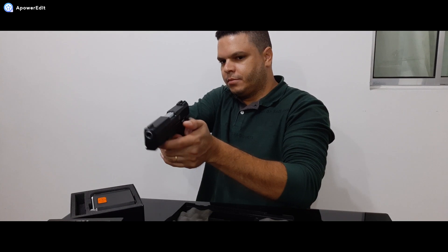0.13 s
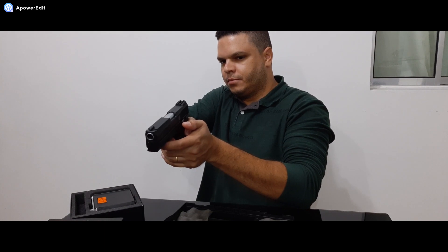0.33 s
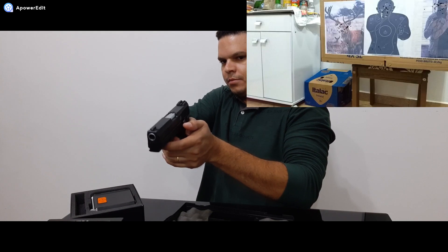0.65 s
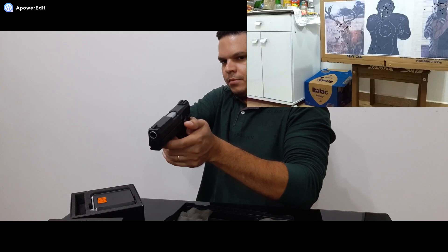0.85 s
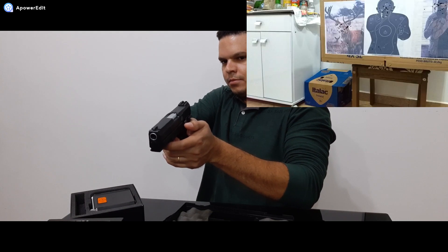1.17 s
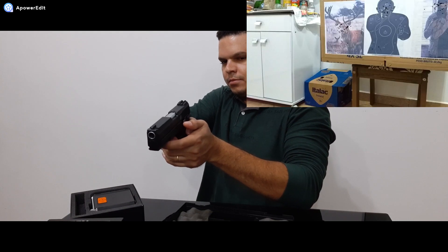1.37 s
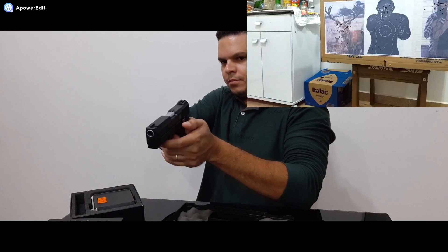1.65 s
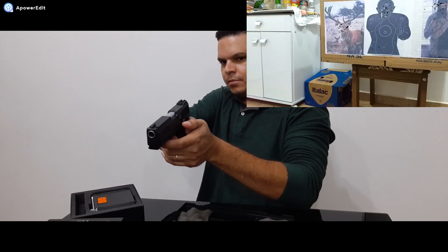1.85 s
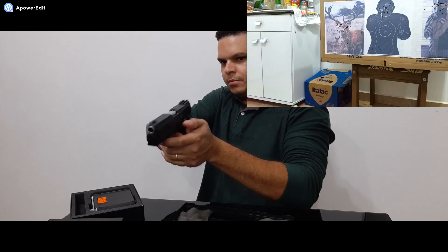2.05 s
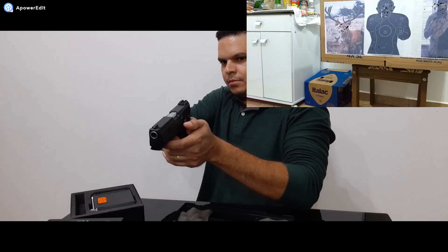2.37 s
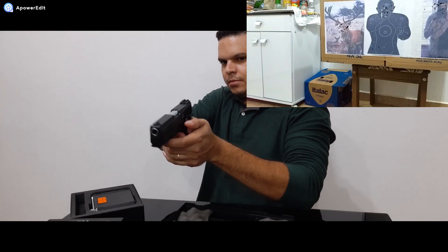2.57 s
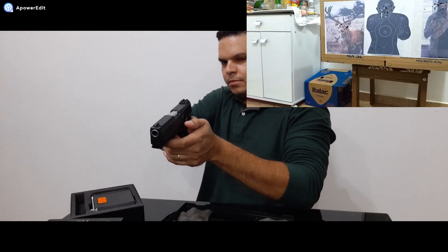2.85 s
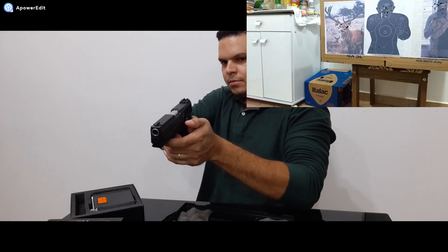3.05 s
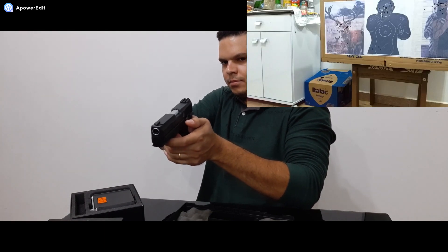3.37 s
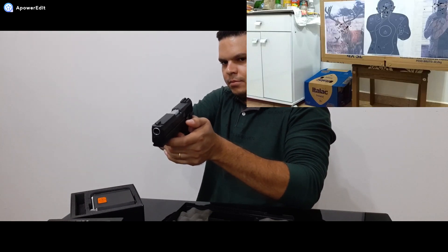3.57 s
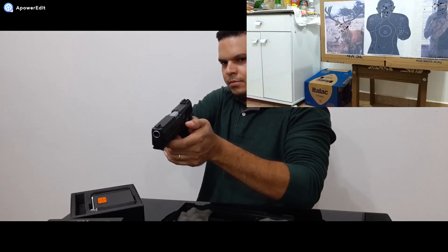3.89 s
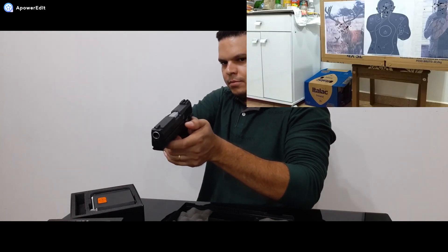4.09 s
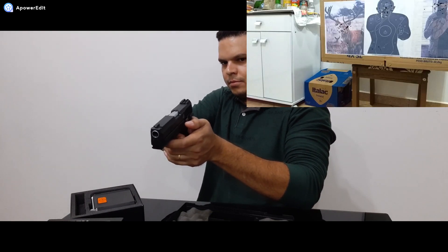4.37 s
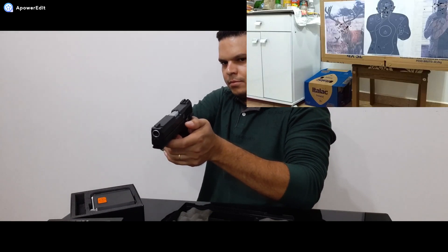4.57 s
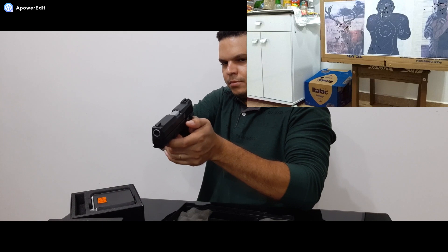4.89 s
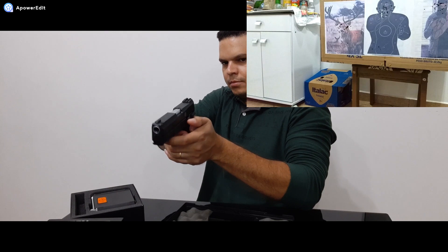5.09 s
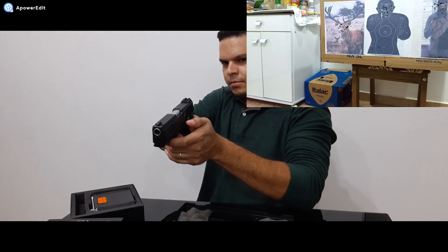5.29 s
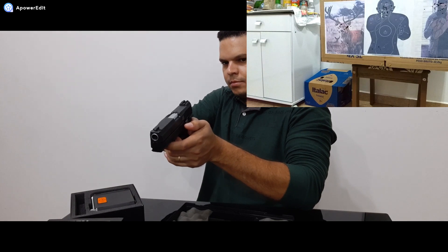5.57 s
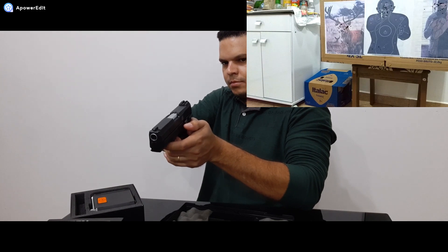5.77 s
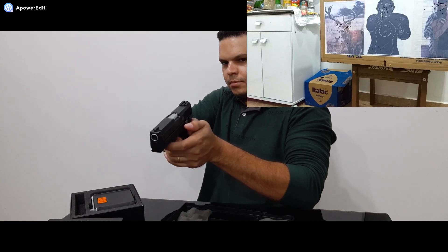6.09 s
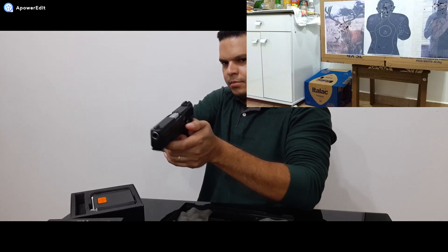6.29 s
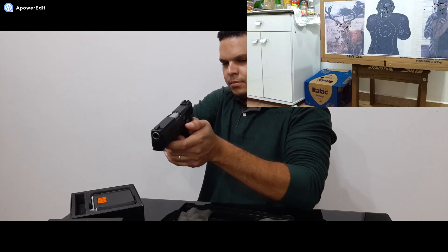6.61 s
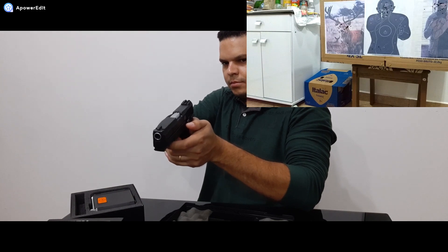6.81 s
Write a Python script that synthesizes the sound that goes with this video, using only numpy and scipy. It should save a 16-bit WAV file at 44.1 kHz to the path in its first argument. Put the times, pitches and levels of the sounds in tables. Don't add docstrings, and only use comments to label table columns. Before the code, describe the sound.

A small, hard-walled room with very quiet hush and faint hum opens on the decaying tail of an earlier shot. A small trigger tick at 0.1 s leads to the first gas pistol shot at 0.2 s. More follow at about 0.65, 1.15, 1.6, 2.1, 2.6, 3.25, 3.7, 4.5 and 5.15 s, then after a longer gap at 6.35 and 6.75 s. Each is a bright crack of a few milliseconds with a low push of air, gas hissing, and about 25 ms later the metal slide slamming into its stop. Reflections ring for nearly a second, overlapping the next shot. Dry clicks and bouncing pellets tick between shots until about 5.6 s. The close stereo microphone overloads; level dips around blasts, then swells briefly. The last ringing fades out abruptly around 7 s.

```python
import sys
import numpy as np
from scipy import signal
from scipy.fft import rfft, irfft
from scipy.io import wavfile
from scipy.ndimage import uniform_filter1d

SR = 44100
rng = np.random.default_rng(int(sys.argv[2]) if len(sys.argv) > 2 else 0)


def transcribe(signal):
    frames = np.atleast_2d(signal).T
    limited = np.clip(frames, -1, 1)
    pcm = np.round(limited * 32767).astype(np.int16)
    wavfile.write(sys.argv[1], SR, pcm)


def volts_from_db(level):
    exponent = np.asarray(level, float) / 20
    return 10 ** exponent


N = 306431

# (frequency [Hz], level [dB])
HUSH_SPECTRUM = [(25, -20.5), (70, -17), (237, -8), (354, -17), (543, -9), (729, -19), (3000, -30.5),
                 (14000, -35)]
# (frequency [Hz], level [dB])
HUM_LINES = [(120, -67.5), (242.2, -67), (543.7, -71.5), (1453, -73.5), (2186, -80.5), (4253, -88.5),
             (7628, -83.5), (7768, -83)]
# (time [s], room level [dB], brightness [dB/octave])
EARLIER_SHOT = (-0.27, -9.5, 0.09)
# (time [s], level [dB], brightness [dB/octave], room share [dB])
TICKS = [(0.0964, -24, -4, -5.5), (0.5624, -18.5, 0.6, -15.5), (.9208, -23.5, -4.5, -11),
         (.9792, -25.5, 0.5, -9.5), (.9941, -24, -3, -11.5), (1.416, -21.5, -6.5, -8),
         (1.447, -24, -1.5, -9.5), (1.5199, -30.5, -1.5, -11.5), (1.98, -21, -2.1, -10.5),
         (2.0054, -19.5, -2.5, -12.5), (2.528, -33, -0.2, -11.5), (2.5997, -20, -2, -8.5),
         (2.9327, -20, -.7, -15), (2.9984, -24, -2.44, -9), (3.1903, -29, -4, -3),
         (3.5544, -21.5, -1.6, -10), (3.6643, -30, -2.78, -9.5), (3.7058, -29.5, -0.1, -13.5),
         (4.7829, -21, -2.5, -10), (4.8995, -27.5, -0.5, -16.5), (5.1187, -23, -2.7, -6),
         (5.551, -25.5, -6, -8)]
# (time [s], push at left port [dB], push at right port [dB], early gas jet [dB], brightness [dB/octave])
SHOTS = [(.194, -13, -.5, -3, -0.04), (0.6447, -10, -30, -13.5, 1.16), (1.1377, -2.5, 1, -14, .49),
         (1.62, -18, -8, -10.5, 0.7), (2.1014, -4.5, -18, -2, -0.17), (2.6177, -15.5, -12, -11.5, 0.77),
         (3.2361, -2.5, -16, -6, .1), (3.7161, -4.5, -15.5, -13, 0.93), (4.5021, -6.5, -8, -11.5, 0.1),
         (5.1628, -5, -9.5, -3, 0.82), (6.351, 2.2, 1.5, -0.5, .21), (6.7416, 0.7, -17.5, -2.5, -0.2)]
# (time [s], length [s], loudest slide mode [Hz], level in the room [dB],
# room bloom near 700 Hz [dB])
SLIDE_STOPS = [(0.218, 0.018, 7500, -3.5, -2), (0.669, 0.013, 6400, -5.5, 3.5),
               (1.154, 0.019, 4360, -3.5, -1.2), (1.643, 0.016, 5940, -5, 3.5),
               (2.125, 0.028, 7660, -3, -2.3), (2.642, 0.014, 7000, -5, -1.5),
               (3.253, 0.024, 6700, -3.5, 0), (3.735, 0.016, 5990, -5, 6.5), (4.52, .023, 4330, -4, 1.2),
               (5.189, 0.01, 5750, -5, -0.4), (6.381, .0164, 6500, -4, -0.1),
               (6.764, 0.017, 6260, -3, -3.5)]
# (frequency [Hz], level [dB])
TICK_SPECTRUM = [(150, -58), (400, -11), (1000, -13), (3000, -2.5), (6000, -1), (11000, 3), (15500, -15.5)]
# (frequency [Hz], level [dB])
CRACK_SPECTRUM = [(120, -34.5), (200, 2.5), (1400, 1), (1710, -3), (2290, -1.5), (4250, -1), (5000, 0),
                  (7100, 1), (8180, -3.5), (9290, 3), (9900, -5), (11500, -2.5), (15500, -13)]
# (frequency [Hz], level [dB])
GAS_SPECTRUM = [(59, -44), (100, -14.5), (420, -22.5), (667, -9.5), (1260, -13.5), (1370, -5), (1920, -8),
                (2080, -5.5), (2980, -7), (5270, -6.5), (6650, -2.5), (11000, -7.5), (15500, -19)]
# (frequency [Hz], level [dB], T60 [s])
FRAME_MODES = [(1390, 0, 0.031), (1260, -0.5, 0.025), (520, -11, .012), (305, -3, 0.023)]
# (frequency [Hz], width [Hz], level [dB])
BODY_MODES = [(137.5, 16, 16), (309, 3.5, 11.5), (578, 12, 3), (495.7, 8.2, 5), (727, 12, 1.5),
              (1382, 13, 4), (2008, 310, 1), (4253, 190, 3), (5450, 40, -1), (6030, 97, 6), (7200, 140, 2),
              (7800, 75, 4), (8970, 84, 7.5)]
# (frequency [Hz], width [Hz], level [dB])
SLIDE_MODES = [(670, 120, 3), (1405, 60, 6.5), (2008, 91, 3), (4300, 400, 2.5), (5920, 160, 10),
               (6700, 450, 4), (8820, 170, 2), (10600, 830, 2)]
# (frequency [Hz], level [dB])
TAIL_SPECTRUM = [(24, -37.5), (40, -40), (114, -11), (294, 0), (368, -5.5), (496, -3), (636, -1.5),
                 (703, -4.5), (1600, -2.5), (2210, -2.5), (3060, -4), (7140, 0.5), (11000, -2.5),
                 (15500, -23.5)]
# (frequency [Hz], T60 [s])
ROOM_T60 = [(100, 0.96), (260, 0.81), (700, 1.0), (1840, 1.0), (4850, 0.85), (12800, 0.55)]
# (frequency [Hz], level [dB])
NEXT_ROOM = [(130, -17.5), (600, -15), (2000, -16.5), (6000, -23), (12000, -33.5)]
# (frequency [Hz], share alike [0..1])
LEFT_RIGHT_LIKENESS = [(60, .95), (400, .8), (1500, .1), (4000, .15), (8000, .7), (14000, .4)]
# (frequency [Hz], left minus right [dB])
PORT_LEAN = [(60, -0.5), (130, 0.5), (290, -0.5), (640, 0.5), (1410, -0.5), (3100, 0.5), (6820, -1.5),
             (12000, 0.5)]
# (time after the shot [s], gain [dB])
GAIN_CONTROL = [
    (.0, -1.6),
    (.035, -4),
    (0.05, -3.5),
    (.1, 1.5),
    (.16, 1.5),
    (.3, 0.04),
]

PORT_LAG = 6
HUSH_DB = -59
NEXT_ROOM_STRETCH = 1.9
RIPPLE_DB = 1.5
AIR_DB, AIR_PER_TILT = 1.5, 2
ROOM_ACCENT_DB = 2.5
TICK_T60_S, RATTLE_T60_S = .007, .075
CRACK_DB, CRACK_PER_JET = -3, 0.37
SLIDE_DB, SLIDE_PER_JET = -11, -1.01
KNOCK_DB, KNOCK_PER_PUSH = -12.5, .12
RING_SHARE, ACCENT_DB = .8, 4
HAMMER_S = .004
CRACK_RISE_S, CRACK_HOLD_S, CRACK_FALL_S = 0.00083, 0.0028, .0008
JET_START_S, JET_RISE_S, JET_HOLD_S, JET_FALL_S = 0.0055, .005, .019, 0.0043
JET_SAG, JET_REST = 0.15, 0.15
JET_CLUMP_DB, SLIDE_CLUMP_DB = 2.6, 3.5
REBOUND, REBOUND_S = .2, .004
SUCK_DB, SUCK_S, SUCK_WIDTH_S = -13, .0092, .0006
AHEAD_FROM_DB, AHEAD_FULL_DB = -14, -6.5
AHEAD_DB, AHEAD_S, AHEAD_MORE_S = -7.5, .008, .006
FADE_S = 0.013


def evened(x):
    return x / np.sqrt(np.mean(x ** 2) + 1e-20)


def read(points, hz):
    f, value = np.transpose(points)
    return np.interp(np.log(hz + 1), np.log(f + 1), value)


def tilted(hz, tilt_db):
    return tilt_db * np.log2((hz + 200) / 3000)


def resonance(hz, centre_hz, half_width_hz):
    return 1 / (1 + ((hz - centre_hz) / half_width_hz) ** 2)


def add(mix, s, sound):
    part = mix[:, round(s * SR):][:, :sound.shape[1]]
    part += sound[:, :part.shape[1]]


def colour(x, points, tilt_db=0., ring=0., modes=BODY_MODES):
    hz = np.fft.rfftfreq(x.shape[-1], 1 / SR)
    db = read(points, hz) + tilted(hz, tilt_db)
    db = db + ring * sum(mode_db * resonance(hz, f, width / 2) for f, width, mode_db in modes)
    return irfft(rfft(x) * volts_from_db(db), x.shape[-1])


def pair(count):
    hz = np.fft.rfftfreq(count, 1 / SR)
    shared_noise, left_only_noise = rfft(rng.standard_normal((2, count)))
    alike = np.clip(read(LEFT_RIGHT_LIKENESS, hz), 0, 1)
    lean = volts_from_db(read(PORT_LEAN, hz) / 2)
    lead = np.exp(2j * np.pi * np.minimum(hz * PORT_LAG / SR, 1))
    left = (alike * shared_noise + np.sqrt(1 - alike ** 2) * left_only_noise) * lead
    return irfft(np.array([left * lean, shared_noise / lean]), count)


def puff(points, tilt_db, envelope, ring=0.63, clump_db=0.):
    count = len(envelope)
    lumps = volts_from_db(clump_db * evened(uniform_filter1d(rng.standard_normal(count), 90)))
    noise = evened(colour(pair(8192), points, tilt_db, ring, BODY_MODES + SLIDE_MODES))
    return noise[:, :count] * envelope * lumps


def accent(x, hz, db):
    return colour(x, [(1, 0), (SR, 0)], ring=0.58, modes=[(hz, 700, db)])


def background():
    t = np.arange(N) / SR
    hush = volts_from_db(HUSH_DB) * evened(colour(pair(N + N % 2), HUSH_SPECTRUM))[:, :N]
    waver = evened(uniform_filter1d(rng.standard_normal((len(HUM_LINES), N)), 1200))
    hum = sum(volts_from_db(db) * w * np.sin(2 * np.pi * hz * t) for (hz, db), w in zip(HUM_LINES, waver))
    return hush + hum


def room(hits, points, wait_s, build_s):
    size = 2 * (N // 2 + 1)
    rough = uniform_filter1d(uniform_filter1d(rng.standard_normal(size // 2 + 1), 80), 80)
    noise = colour(pair(size), points, ring=0.87)
    noise = irfft(rfft(noise) * volts_from_db(RIPPLE_DB * evened(rough)), size)
    hz, t, z = signal.stft(evened(noise), SR, nperseg=256, noverlap=192)
    hz = hz[:, None]
    power = np.zeros(z.shape[1:])
    for s, db, tilt_db, bloom_db, air_db, mode_hz, mode_db in hits:
        near = (t > s) & (t < s + 1.5)
        age = t[near] - s
        start_db = db + tilted(hz, tilt_db)
        start_db = start_db + bloom_db * resonance(hz, 700, 350)
        start_db = start_db + air_db * resonance(hz, 12000, 2000)
        start_db = start_db + mode_db * resonance(hz, mode_hz, 400)
        fall_db = 60 * age / read(ROOM_T60, hz)
        this_room = volts_from_db(start_db - fall_db) ** 2
        next_room = volts_from_db(start_db + read(NEXT_ROOM, hz) - fall_db / NEXT_ROOM_STRETCH) ** 2
        power[:, near] += (this_room + next_room) * np.clip((age - wait_s) / build_s, 0, 1) ** 2
    return signal.istft(z * np.sqrt(power), SR, nperseg=256, noverlap=192)[1][:, :N]


def tick(db, tilt_db):
    t = np.arange(1024) / SR
    envelope = volts_from_db(-60 * t / TICK_T60_S) + volts_from_db(-9.5 - 60 * t / RATTLE_T60_S)
    return volts_from_db(db - 2.0) * puff(TICK_SPECTRUM, tilt_db, envelope)


def muzzle_crack(t):
    return np.exp(np.minimum(t, 0) / CRACK_RISE_S - np.maximum(t - CRACK_HOLD_S, 0) / CRACK_FALL_S)


def pressure_push(t):
    u = np.maximum(t - .0015, 0) / np.array([[.0017], [.0015]])
    push = u * (1 - np.array([[.28], [.33]]) * u) * np.exp(1 - u)
    dip = 0.61 * np.exp(-((t - .001) / 0.00079) ** 2)
    v = np.maximum(t - .004, 0) / REBOUND_S
    return push - dip - REBOUND * v * np.exp(1 - v)


def breech_jet(t):
    full_s = JET_START_S + JET_RISE_S
    end_s = full_s + JET_HOLD_S
    jet = np.interp(t, [JET_START_S, full_s, end_s], [0, 1, 1 - JET_SAG])
    return jet * (JET_REST + (1 - JET_REST) * np.exp(-np.maximum(t - end_s, 0) / JET_FALL_S))


def frame_knock(t):
    modes = sum(volts_from_db(db - 60 * t / t60) * np.sin(2 * np.pi * hz * t) for hz, db, t60 in FRAME_MODES)
    return modes * (t > 0)


def shot(crack_db, push_db, jet_db, tilt_db, pan_db, knock_db):
    t = np.arange(4096) / SR - HAMMER_S
    crack = volts_from_db(crack_db + 3) * puff(CRACK_SPECTRUM, tilt_db, muzzle_crack(t))
    jet = volts_from_db(jet_db) * puff(GAS_SPECTRUM, tilt_db, breech_jet(t), RING_SHARE, JET_CLUMP_DB)
    push = volts_from_db(push_db + np.array([[.5], [-.5]]) * pan_db) * pressure_push(t)
    suck = volts_from_db(SUCK_DB) * np.exp(-((t - SUCK_S) / SUCK_WIDTH_S) ** 2)
    return crack + jet + push - suck + volts_from_db(knock_db) * frame_knock(t)


def slide(db, length_s):
    t = np.arange(4096) / SR
    envelope = np.interp(t, [0, .001, length_s, length_s + 0.015], [0.36, 0.56, 0.79, 0.0456])
    return volts_from_db(db) * puff(GAS_SPECTRUM, 0.62, envelope, RING_SHARE, SLIDE_CLUMP_DB)


def scene():
    mix = background()
    blasts = [EARLIER_SHOT + (0, 0, 0, 0)]
    for (s, _, _, _, tilt_db), (_, _, mode_hz, room_db, bloom_db) in zip(SHOTS, SLIDE_STOPS):
        air_db = AIR_DB + AIR_PER_TILT * tilt_db
        blasts.append((s, room_db - 3, tilt_db, bloom_db, air_db, mode_hz, ROOM_ACCENT_DB))
    mix += room(blasts, TAIL_SPECTRUM, wait_s=0.0022, build_s=0.013)
    tick_hits = [(s, db + wet_db, tilt_db, 0, 0, 0, 0) for s, db, tilt_db, wet_db in TICKS]
    mix += room(tick_hits, TICK_SPECTRUM, wait_s=.001, build_s=.002)
    for s, db, tilt_db, _ in TICKS:
        add(mix, s, tick(db, tilt_db))
    for (s, left_db, right_db, jet_db, tilt_db), (stop_s, length_s, mode_hz, *_) in zip(SHOTS, SLIDE_STOPS):
        push_db = (left_db + right_db) / 2
        crack_db = CRACK_DB + CRACK_PER_JET * jet_db
        knock_db = KNOCK_DB + KNOCK_PER_PUSH * push_db
        blast = shot(crack_db, push_db, jet_db, tilt_db, left_db - right_db, knock_db)
        add(mix, s - HAMMER_S, accent(blast, mode_hz, ACCENT_DB))
        slam = slide(SLIDE_DB + SLIDE_PER_JET * jet_db, length_s)
        add(mix, stop_s, accent(slam, mode_hz, ACCENT_DB))
    return mix


def low_pass(x):
    return signal.sosfilt(signal.butter(12, 15740, fs=SR, output="sos"), x)


def record(dry):
    t = np.arange(N) / SR
    after_s, after_db = np.transpose(GAIN_CONTROL)
    duck_db = np.zeros(N)
    for s, left_db, right_db, *_ in SHOTS:
        share = np.interp((left_db + right_db) / 2, [AHEAD_FROM_DB, AHEAD_FULL_DB], [0, 1])
        ahead_s = AHEAD_S + share * AHEAD_MORE_S
        ahead = np.interp(t - s, [-ahead_s - .003, -ahead_s, -.002, 0], [0, 1, 1, 0])
        duck_db += np.interp(t - s, after_s, after_db, 0, 0)
        duck_db += share * AHEAD_DB * ahead
    overloaded = np.clip(dry * volts_from_db(duck_db), -1, 1)
    fade = np.clip((N / SR - t) / FADE_S, 0, 1)
    return low_pass(overloaded * fade)


dry = scene()
out = record(dry)
transcribe(out)
```